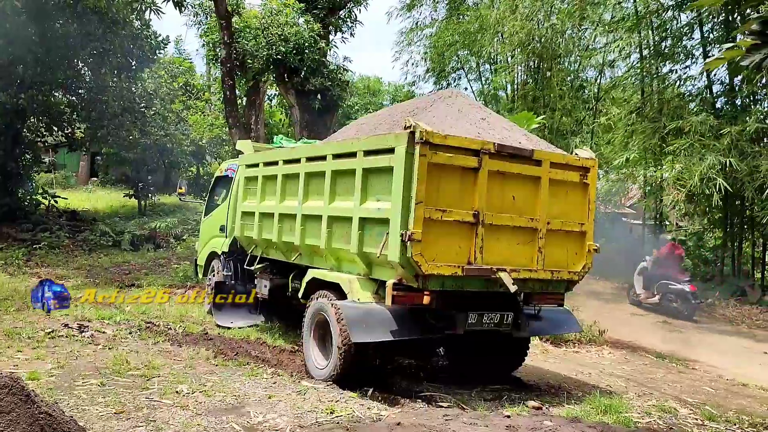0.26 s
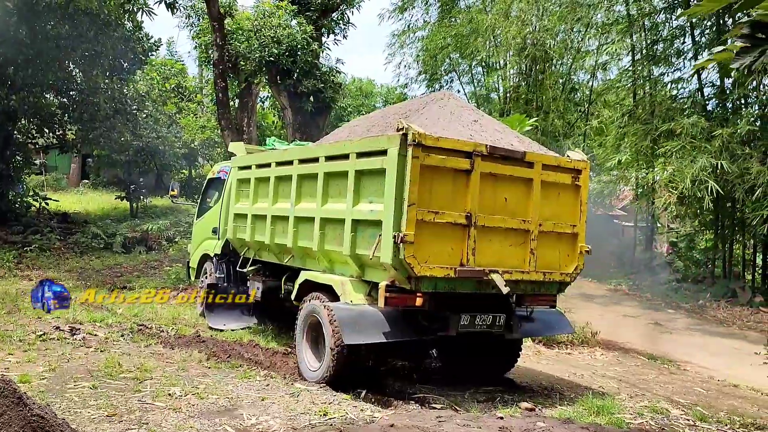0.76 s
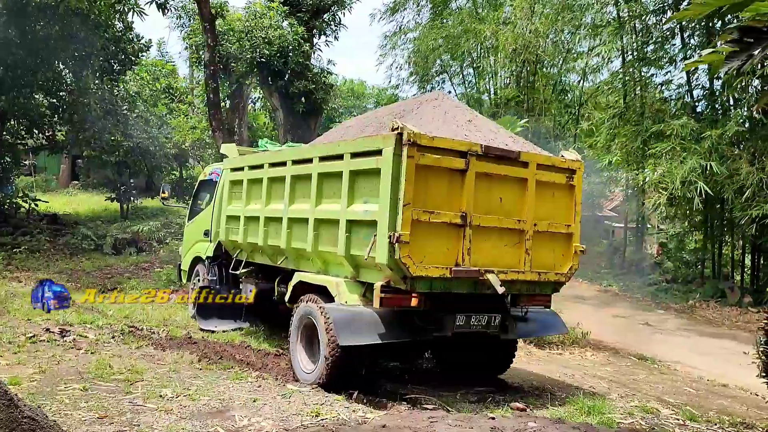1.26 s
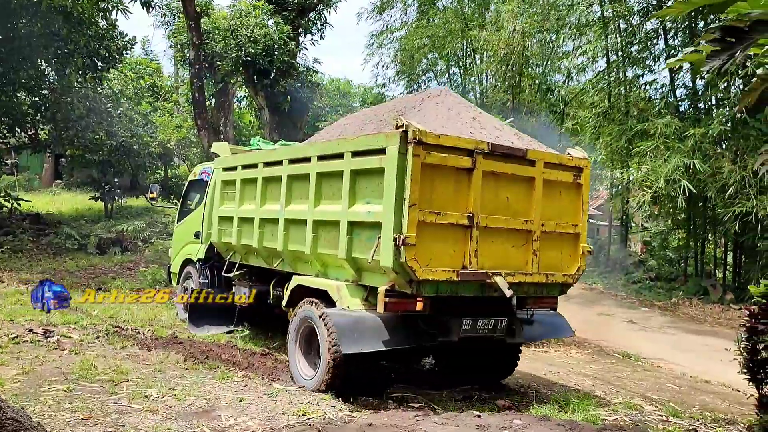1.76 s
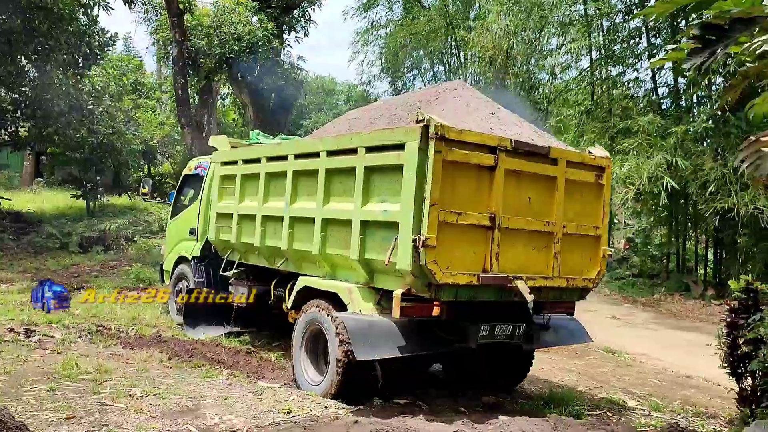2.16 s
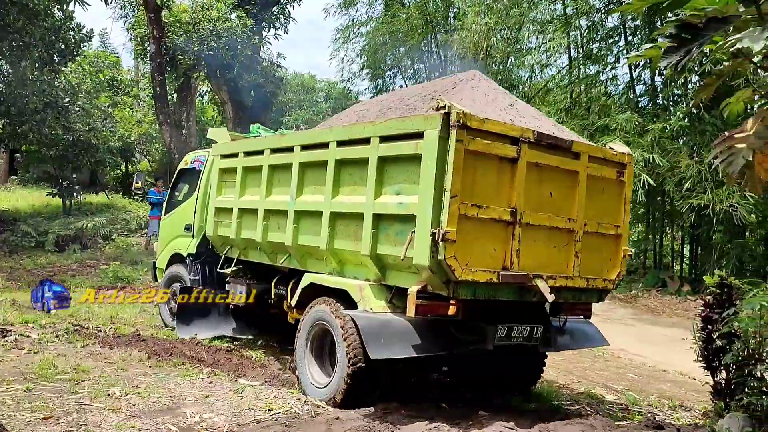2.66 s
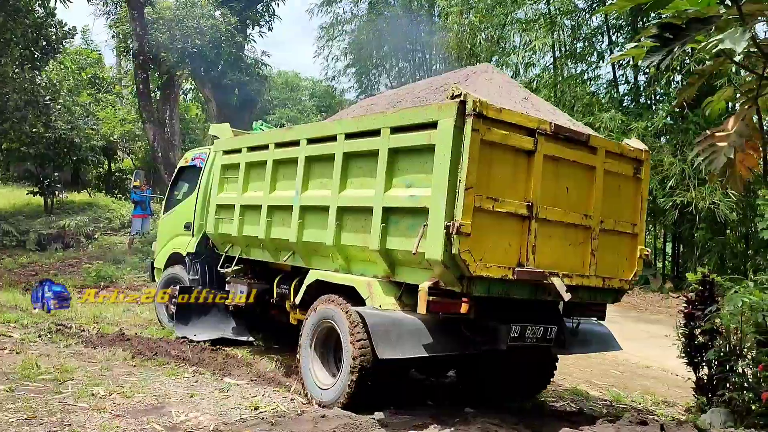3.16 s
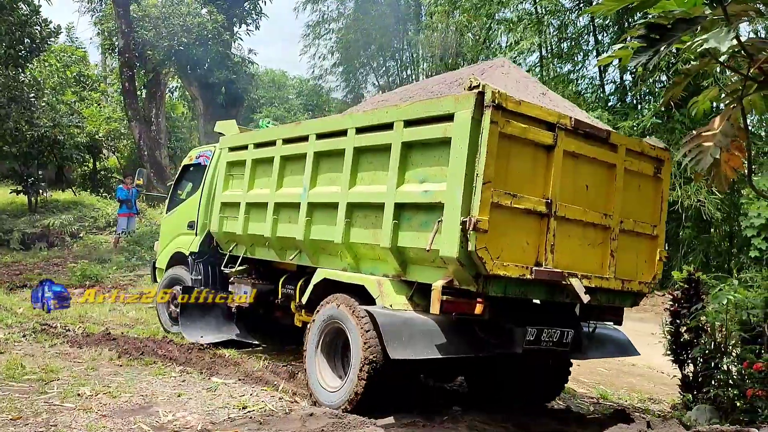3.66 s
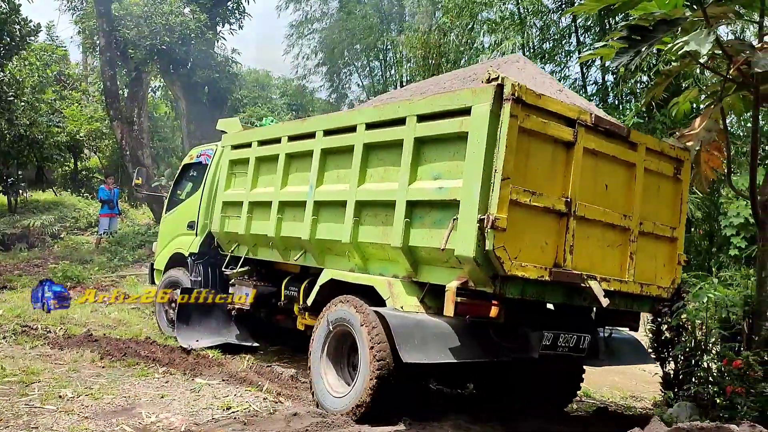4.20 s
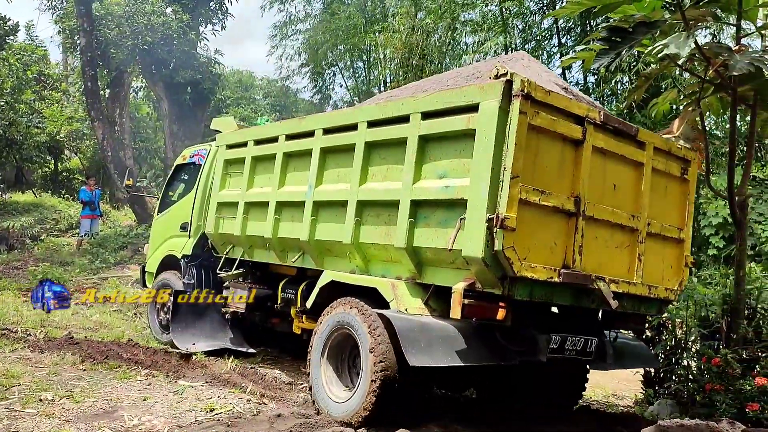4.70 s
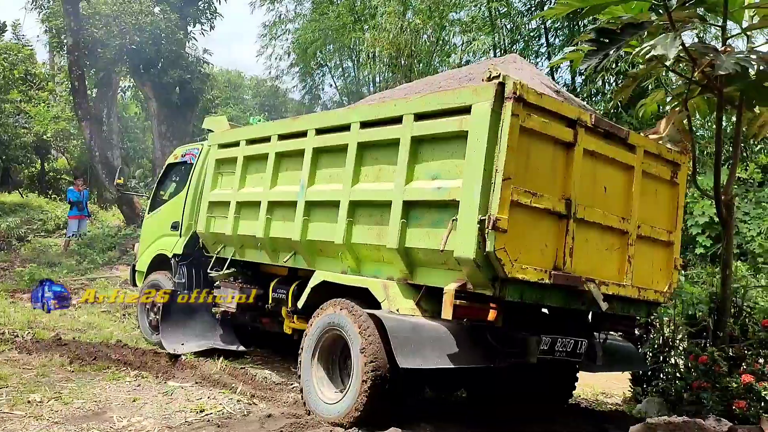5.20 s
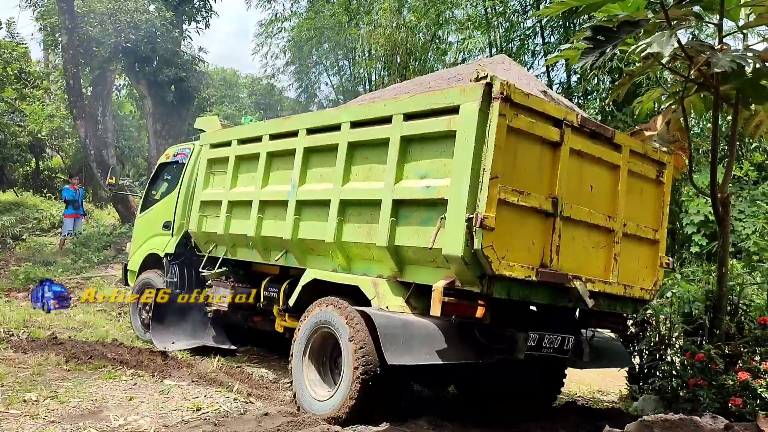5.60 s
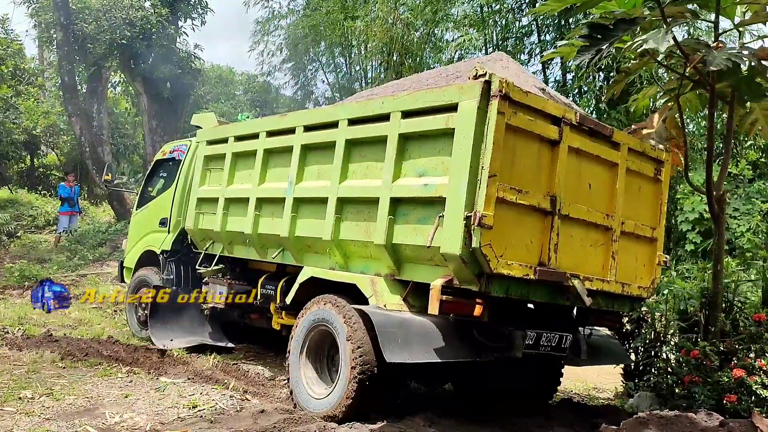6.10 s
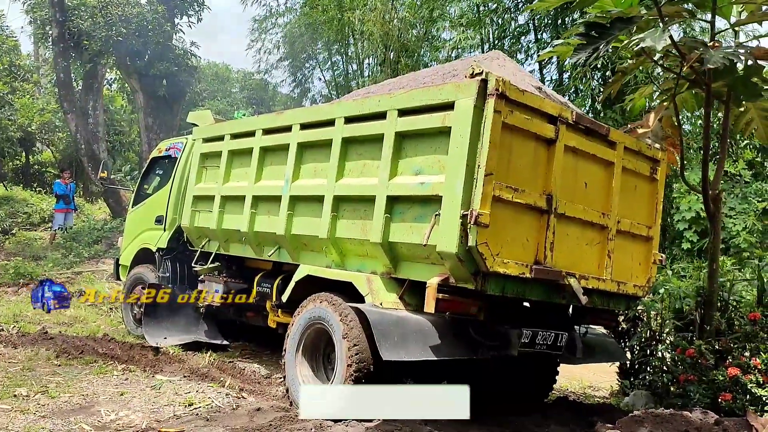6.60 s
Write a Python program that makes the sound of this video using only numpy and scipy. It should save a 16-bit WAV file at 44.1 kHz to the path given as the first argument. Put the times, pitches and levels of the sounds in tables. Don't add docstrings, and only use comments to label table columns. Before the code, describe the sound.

A heavy diesel truck engine sags, then bellows in hard bursts with a thin turbo-like whistle, before dropping to a slow chugging idle outdoors.

```python
import sys
import numpy as np
from scipy import signal
from scipy.fft import rfft, irfft, next_fast_len
from scipy.io import wavfile
from scipy.ndimage import uniform_filter1d, map_coordinates

SR = 44100
rng = np.random.default_rng(int(sys.argv[2]) if len(sys.argv) > 2 else 0)


def how_loud(loudness_db):
    steps = np.asarray(loudness_db, float) / 20
    return 10 ** steps


def file_out(sig):
    cols = np.atleast_2d(sig).T
    lim = np.clip(cols, -1, 1)
    pcm = np.round(lim * 32767).astype(np.int16)
    wavfile.write(sys.argv[1], SR, pcm)


N = 302085

# time_s, rate_firings_per_s
SPEED = [(.13, 37.5), (.3, 28), (.5, 38), (.67, 54.3), (.93, 53.2), (1.28, 66), (1.57, 57), (1.78, 54.8),
         (2.19, 54.6), (2.52, 34.2), (2.9, 39.4), (3.62, 42), (3.97, 32.8), (4.5, 30.5), (4.74, 32.7),
         (4.97, 37.2), (5.3, 24.6), (5.9, 21.1)]
FIRST_TURN_FIRINGS, FLYWHEEL_S = -.38, .12
CYLINDERS_DB = [.4, -.3, .05, -.15]
# time_s, exhaust_db, gas_flow_db, strain_db
EFFORT = [(0, -31, -31.5, 6), (.06, -26.5, -44.5, 1.5), (.24, -39.5, -50.5, -5), (.45, -26, -46.5, 1.5),
          (.6, -15, -36.5, 1.5), (.69, -18.5, -40.5, -1), (.97, -21, -42, -0.5), (1.12, -14.5, -36, -0.5),
          (1.5, -13.5, -32.5, -2), (2.16, -19.5, -34.5, 3), (2.42, -29.5, -41.5, -1), (2.62, -20.5, -43, 4),
          (3.5, -15, -35.5, -1), (3.82, -21.5, -44, 0), (4.4, -31, -41.5, 2.5), (4.94, -19, -35, -0.5),
          (5.06, -30, -43.5, -4), (5.3, -37.5, -51.5, -15)]
# down_s, up_s, whistle_peak_s, whistle_peak_db, less_at_ends_db
PEDAL = [
    (.49, 0.693, .6, -37.5, -1),
    (.8, .85, 0.85, -34.5, 7),
    (.955, 2.19, 1.44, -28, 9),
    (2.5, 3.7, 3.15, -30, 3),
    (3.81, 4.971, 4.56, -30.5, 6),
]
PRESS_S, SPOOL_S = .05, .2
# time_s, half_length_s, loss_db
MISFIRES = [
    (0.713, 0.032, 15),
    (0.79, 0.013, 19),
    (0.862, 0.028, 13),
    (0.942, 0.024, 12),
    (2.36, 0.036, 7),
    (4.935, .08, -4.5),
    (5.38, 0.14, 9),
]
# rate_firings_per_s, throb_db, bark_db, rasp_over_boom_db, clatter_db
TUNING = [(20.6, -1.5, -25, -30, -44), (30.9, 4, -2.5, -21.5, -40.5), (33.9, -22, -9, -30, -38.5),
          (41.7, -10.5, -2, -20, -36), (51.5, 0, -0.5, -18, -35.5), (54.53, -4, 2.5, -9, -37.5),
          (57.8, -1, 0.5, -21, -37), (66, -16, 1, -18, -35.5)]
# throb_db, bark_db, rasp_db, clatter_db, hiss_db
COAST_DB = (1.5, -6, -12, -2, -3)
COAST_SCATTER_DB = 2
THROB_MISSES = .37
RASP_PER_STRAIN = 1.2
EARLIER_DB, EARLIER_S = 14, .025

# pitch_hz, t60_s, rise_s, late_s
THROB = (49, .11, .02, .0013)
# pitch_hz, t60_s, rise_s, late_s
BOOM = (96, .031, .03, .0006)
# pitch_hz, t60_s, rise_s, late_s
BARK = (181, .036, .0033, -.0004)
# pitch_hz, t60_s, rise_s, late_s
THUMP = (95, 0.052, 0.038, 0.00043)
# pitch_hz, t60_s, rise_s, late_s
BRAY = (228, .028, .0033, -.0004)
# pitch_hz, t60_s, rise_s, late_s
RASP = (340.7, 0.035, 0.0025, 0.00078)
THUMP_DB, BRAY_DB = -5.5, 3
# freq_hz, gain_db
SHELL = [(4, -60), (16, 6), (22, 11), (33, 4.5), (45, -3), (190, 0.5), (220, 0.5), (250, -5.5), (290, -7.5),
         (500, -44)]
# freq_hz, density_db_per_hz
RUMBLE = [(15, -36), (40, -9.5), (100, -1.5), (210, -5.5), (280, -14), (400, -12), (520, -54), (900, -47.5)]
# freq_hz, density_db_per_hz
ROAR = [(300, -27), (450, 1.5), (520, -5), (680, 4.5), (950, 0.5), (1100, -16), (1500, -13.5), (2000, -6.5),
        (2600, -13.5), (4000, -40)]
# freq_hz, density_db_per_hz
CLATTER = [(240, -13), (400, -3), (573, -10), (893, 0.5), (1090, -5), (1200, -5), (1740, -3.5),
           (2100, -0.5), (5000, -18.5), (6500, -41), (11000, -120)]
# pitch_hz, width_hz, level_db
PANELS = [(730, 75, -0.5), (1240, 120, -6), (1518, 95, 2.5), (1914, 12, 8), (2090, 51, 1.5),
          (2355, 12, 6.5), (2600, 57, -9)]
# freq_hz, density_db_per_hz
HISS = [(2470, -3), (4200, 0), (5240, -3.5), (5690, -5), (7440, -4.5), (10200, -18.5), (12800, -19),
        (13800, -19), (14400, -72)]
# freq_hz, density_db_per_hz
AIR = [(200, -23), (330, -12), (1000, -12), (5000, -19), (10000, -20), (14000, -25)]
JET_HZ, JET_HZ_PER_FIRING = 2382, 25.12
RELIEF, COASTING = 56, 28
JET_DIES_S, WAVER_HZ, TONE_DB = .068, 54.9, -.5
# time_s, pitch_hz, t60_s, level_db
SQUEAK = (2.432, 10300, .08, -41)
# freq_hz, correlation
ALIKE = [(60, 1.0), (130, 1.0), (280, 0.99), (620, 0.6), (1350, 0.16), (2940, 0.01), (6410, -0.07),
         (14000, 0.01)]
# freq_hz, left_minus_right_db
LEAN = [(60, 0.0), (110, 0.5), (200, 0.5), (370, 0.5), (680, -1.0), (1240, -2.0), (2270, -2.0),
        (4160, -3.0), (7620, -2.0), (14000, -0.5)]


def unit(x):
    return x / np.sqrt(np.mean(np.abs(x) ** 2) + 1e-20)


def along(points, hz):
    f, v = np.transpose(points)
    return np.interp(np.log(hz + 1), np.log(f + 1), v)


def curves(rows):
    s, *cols = np.transpose(rows)
    return [np.interp(np.arange(N) / SR, s, c) for c in cols]


def wobble(rate_hz):
    knots = rng.standard_normal(int(N * rate_hz / SR) + 4)
    return map_coordinates(knots, [np.arange(N) * rate_hz / SR])


def filtered(x, response):
    m = next_fast_len(N + 8192)
    return irfft(rfft(x, m) * response(np.fft.rfftfreq(m, 1 / SR)), m)[..., :N]


def lag(x, seconds):
    k = np.exp(-1 / (seconds * SR))
    return signal.lfilter([1 - k], [1, -k], x - x[0]) + x[0]


def port_lean(hz):
    return how_loud(along(LEAN, hz) / 2 * [[1], [-1]])


def rush(spectrum, patchy_db):
    z = signal.stft(rng.standard_normal((2, N)), nperseg=512)[2]
    field = uniform_filter1d(rng.standard_normal(z.shape[1:]), size=7, axis=0)
    field = uniform_filter1d(field, size=7, axis=1)
    noise = signal.istft(z * how_loud(patchy_db * unit(field)), nperseg=512)[1][:, :N]

    def mid_side(hz):
        angle = np.arccos(np.clip(along(ALIKE, hz), -1, 1)) / 2
        return how_loud(along(spectrum, hz)) * [np.cos(angle), np.sin(angle)]

    mid, side = filtered(noise, mid_side)
    pair = filtered(np.array([mid + side, mid - side]), port_lean)
    return pair / np.std(pair.mean(0))


def ring(at, sizes, mode):
    hz, t60_s, rise_s, late_s = mode
    t = np.arange(SR // 8) / SR
    shape = np.sin(2 * np.pi * hz * t) * how_loud(-60 * t / t60_s) * (1 - np.exp(-t / rise_s)) ** 2
    lead = round((3 / 4 / hz - late_s) * SR)
    blows = np.bincount(at, sizes, N + lead)
    return signal.fftconvolve(blows, shape * np.sqrt(SR) / np.linalg.norm(shape))[lead:lead + N]


def crank():
    rate = uniform_filter1d(curves(SPEED)[0], size=round(FLYWHEEL_S * SR))
    return rate, np.cumsum(rate) / SR + FIRST_TURN_FIRINGS


def firings(turns):
    return np.flatnonzero(np.diff(np.floor(turns)) > 0)


def breath(turns, depth, tail, delay):
    burst = 1 + depth * np.exp(-((turns - delay) % 1) / tail)
    return unit(uniform_filter1d(burst, size=90))


def pedal(seconds):
    t = np.arange(N) / SR
    pressed = sum(1. * ((t > down) & (t < up)) for down, up, *_ in PEDAL)
    return lag(pressed, seconds)


def levels(rate):
    t = np.arange(N) / SR
    level_db, flow_db, strain_db = curves(EFFORT)
    missed_db = sum(loss * np.clip(1 - np.abs(t - s) / half, 0, 1) for s, half, loss in MISFIRES)
    speeds, *answers = np.transpose(TUNING)
    by_speed = [np.interp(rate, speeds, db) for db in answers] + [flow_db]
    throb, bark, rasp, clatter, hiss = by_speed + np.outer(COAST_DB, 1 - pedal(PRESS_S))
    clatter = clatter + EARLIER_DB * np.exp(-t / EARLIER_S)
    throb = level_db + throb - THROB_MISSES * missed_db
    rasp = rasp + RASP_PER_STRAIN * strain_db
    return throb, level_db - missed_db, bark + strain_db, rasp, clatter, hiss


def exhaust(rate, turns, throb_db, boom_db, bark_db, rasp_db):
    at = firings(turns)
    luck = rng.standard_normal((len(at), 3))
    slow = (rate.min() / rate) ** 2
    uneven_db = np.resize(CYLINDERS_DB, len(at)) + .25 * luck[:, 0]
    size = how_loud(uneven_db * (1 + 4 * slow[at])) / np.sqrt(rate[at])
    ragged = (1 - pedal(PRESS_S)) * (1 - slow)
    size = size * how_loud(COAST_SCATTER_DB * luck[:, 1] * ragged[at])
    bark_level_db, rasp_level_db = boom_db + bark_db, boom_db + rasp_db
    x = ring(at, size * how_loud(throb_db[at] - .5), THROB)
    x += ring(at, size * how_loud(boom_db[at] + .95), BOOM)
    x += ring(at, size * how_loud(bark_level_db[at] + .3 * luck[:, 1]), BARK)
    x += ring(at, size * slow[at] * how_loud(boom_db[at] + THUMP_DB), THUMP)
    x += ring(at, size * how_loud(rasp_level_db[at] + BRAY_DB), BRAY)
    back = firings(turns - .53)
    for level_db, mode in [(throb_db, THROB), (boom_db, BOOM)]:
        x += ring(back, .42 * slow[back] * how_loud(level_db[back]) / np.sqrt(rate[back]), mode)
    x = filtered(x, lambda hz: how_loud(along(SHELL, hz)))
    x += ring(at, size * how_loud(rasp_level_db[at] - 1.5 + 1.5 * luck[:, 2]), RASP)
    rumble = how_loud(.6 * boom_db - 20) * breath(turns, .25, .35, -.11) * rush(RUMBLE, patchy_db=1.5)
    roar = how_loud(.85 * bark_level_db - 24) * breath(turns, .16, .73, .02) * rush(ROAR, patchy_db=2)
    return filtered(np.array([x, x]), port_lean) + rumble + roar


def panels(hz):
    total = 0
    for k, (center, width, db) in enumerate(PANELS):
        damping = 1j * hz * width
        total = total + (-1) ** k * how_loud(db) * damping / (center ** 2 - hz ** 2 + damping)
    return total


def block(turns, clatter_db):
    at = firings(turns)
    luck = rng.random((2, len(at), 16, 2))
    delay = (luck[..., 0] ** 1.5 * .038 * SR).astype(int)
    when = np.minimum(at[:, None] + delay, N - 1)
    size = (2 * luck[..., 1] - 1) * (1.5 - luck[..., 0])
    blows = np.array([np.bincount(w.ravel(), s.ravel(), N) for w, s in zip(when, size)])
    knocks = filtered(blows, panels)
    knocks = knocks + filtered(knocks[::-1], lambda hz: np.clip(along(ALIKE, hz), 0, 1))
    knocks /= np.sqrt(np.abs(uniform_filter1d(knocks ** 2, size=SR // 4)) + 1e-12)
    gear = how_loud(-1 + .84 * wobble(14)) * rush(CLATTER, patchy_db=1.5)
    gear = gear * breath(turns, .7, .45, -.02)
    return how_loud(clatter_db) * (gear + knocks * how_loud([[-4], [-2]]))


def tailpipe(turns, hiss_db):
    puffs = breath(turns, .75, .3, -.03)
    return how_loud(hiss_db + 1.5 + .54 * wobble(16)) * puffs * rush(HISS, patchy_db=2)


def air():
    return how_loud(-58.5) * rush(AIR, patchy_db=1.5)


def jet(rate):
    fuel = pedal(PRESS_S)
    pressure = lag(COASTING + fuel * (np.minimum(rate, RELIEF) - COASTING), SPOOL_S)
    swell = []
    for down, up, peak, top_db, less_db in PEDAL:
        swell += [(down, top_db - less_db), (peak, top_db), (up, top_db - less_db)]
    db, = curves(swell)
    open_share = pedal(JET_DIES_S)
    return JET_HZ + JET_HZ_PER_FIRING * pressure, db + 20 * np.log10(open_share + 1e-4)


def whistle(turns, hz, db):
    phase = 2 * np.pi * np.cumsum(hz) / SR
    waver = 2 * np.pi * np.cumsum(WAVER_HZ * wobble(120)) / SR
    out = how_loud(db + TONE_DB) * np.sqrt(2) * np.cos(phase + waver) * np.ones((2, 1))
    for multiple, level_db, width_hz in [(1, -4, 75), (1, -1, 190), (2, -19, 450)]:
        a, b = filtered(rng.standard_normal((2, 2, N)), lambda f: 1 / (1 + (f / width_hz) ** 2))
        band = a * np.cos(multiple * phase) + b * np.sin(multiple * phase)
        out += how_loud(db + level_db) * unit(band)
    return out * breath(turns, 1.1, .5, .05) * how_loud([[-1.4], [1.4]])


def squeak():
    s, hz, t60_s, db = SQUEAK
    t = np.maximum(np.arange(N) / SR - s, 0)
    return how_loud(db - 60 * t / t60_s) * (1 - np.exp(-t / .002)) * np.sin(2 * np.pi * hz * t)


def scene():
    rate, turns = crank()
    *pipe_db, clatter_db, hiss_db = levels(rate)
    engine = exhaust(rate, turns, *pipe_db) + block(turns, clatter_db) + tailpipe(turns, hiss_db)
    return engine + whistle(turns, *jet(rate)) + squeak() + air()


def band_limit(x):
    return signal.sosfilt(signal.butter(12, 14560, fs=SR, output="sos"), x)


def record(dry):
    ports = filtered(dry, lambda hz: np.exp(-1j * np.pi * hz * 4 / SR * np.array([[1], [-1]])))
    soft = ports / (1 + np.abs(ports / .95) ** 6) ** (1 / 6)
    return band_limit(soft)


dry = scene()
out = record(dry)
file_out(out)
```